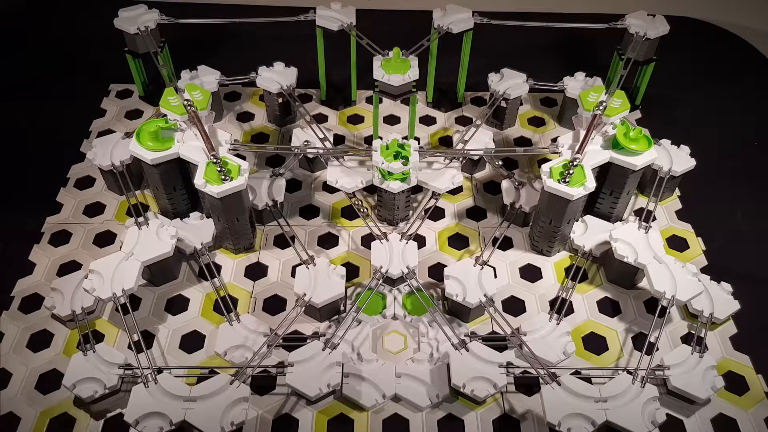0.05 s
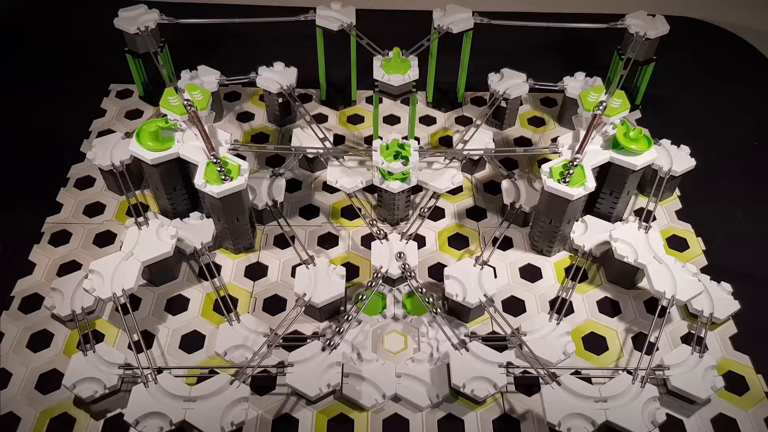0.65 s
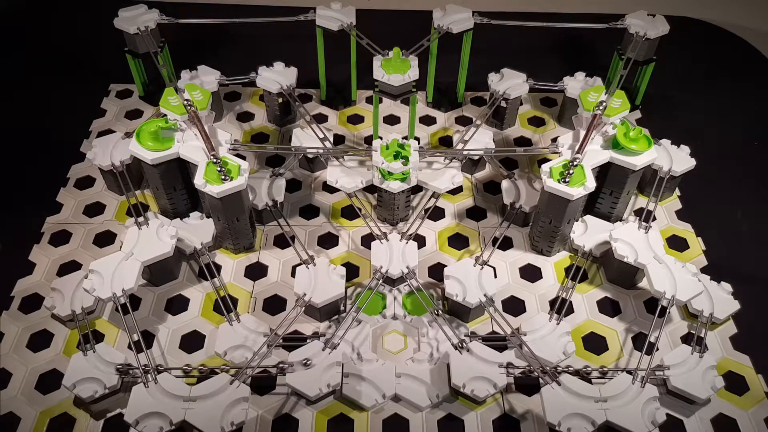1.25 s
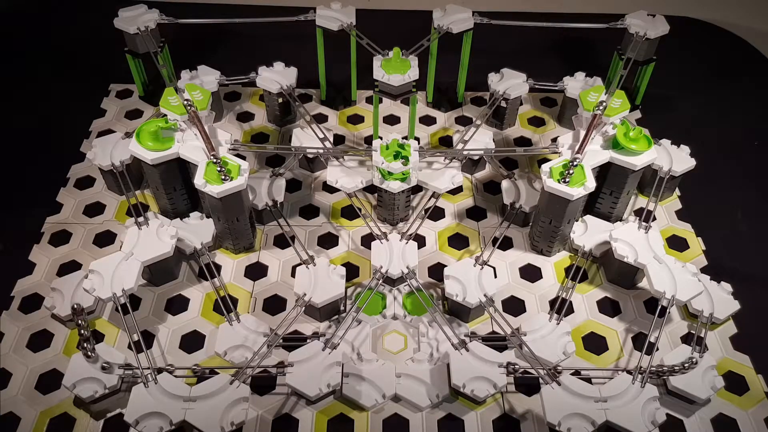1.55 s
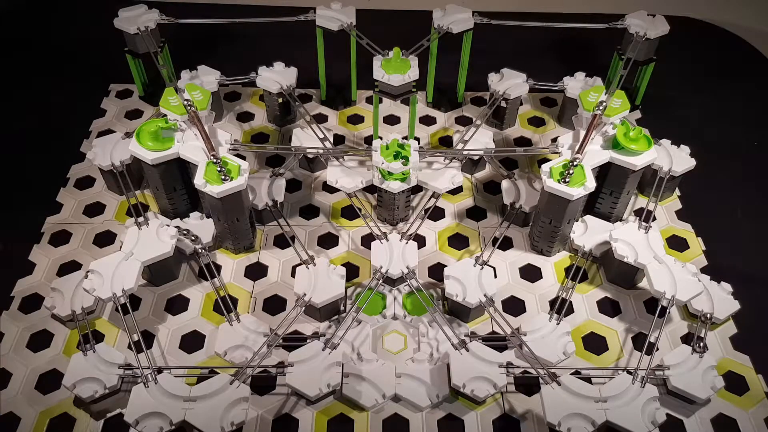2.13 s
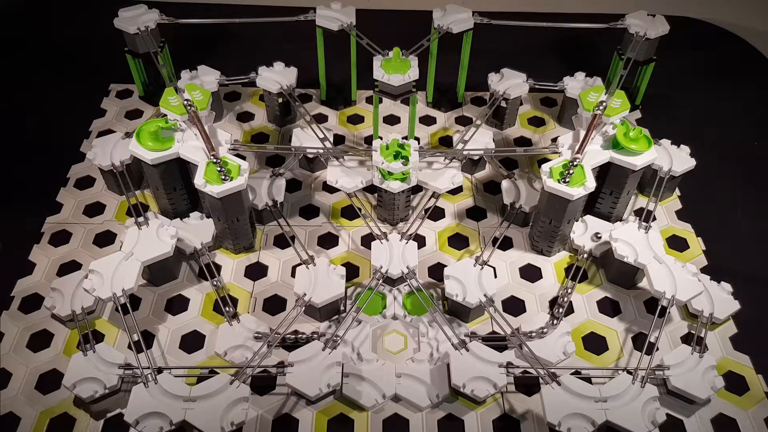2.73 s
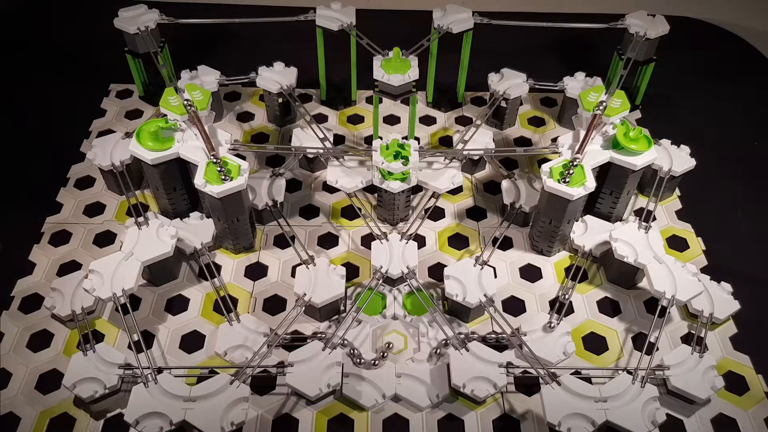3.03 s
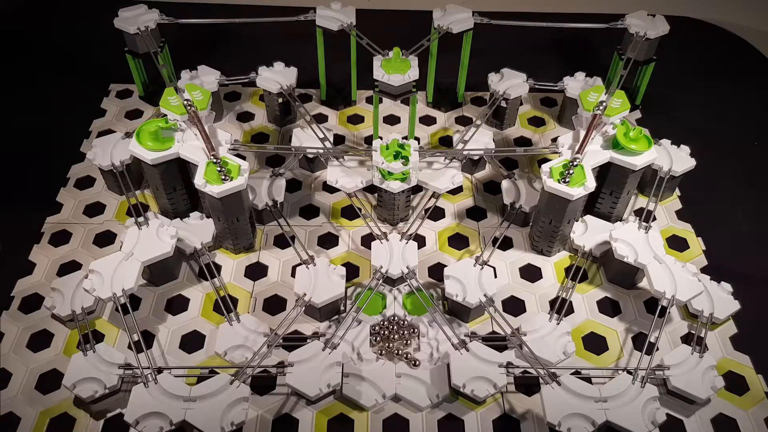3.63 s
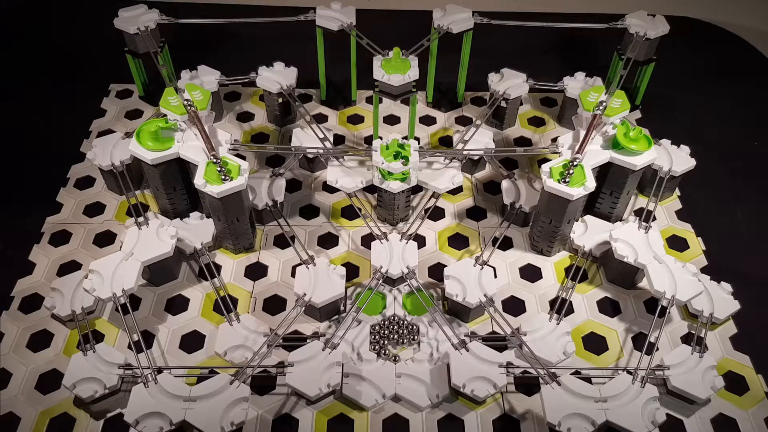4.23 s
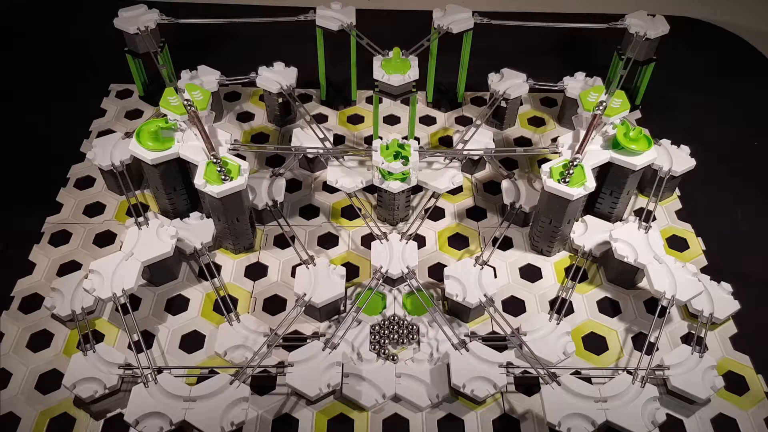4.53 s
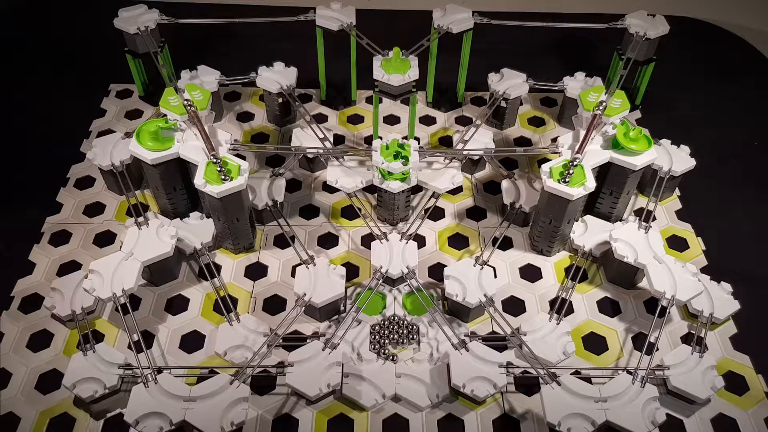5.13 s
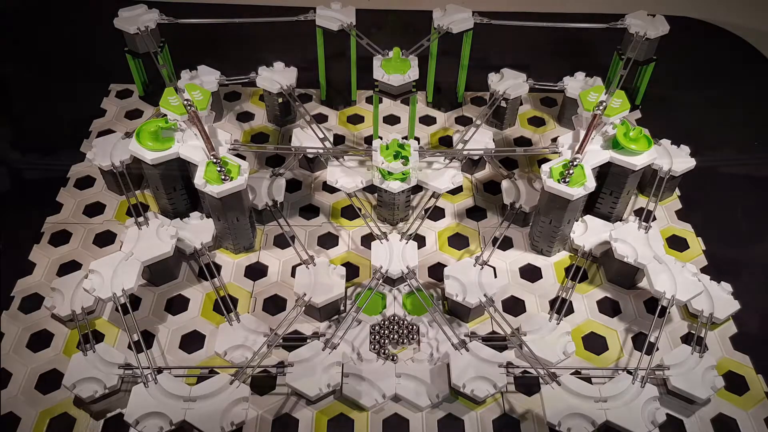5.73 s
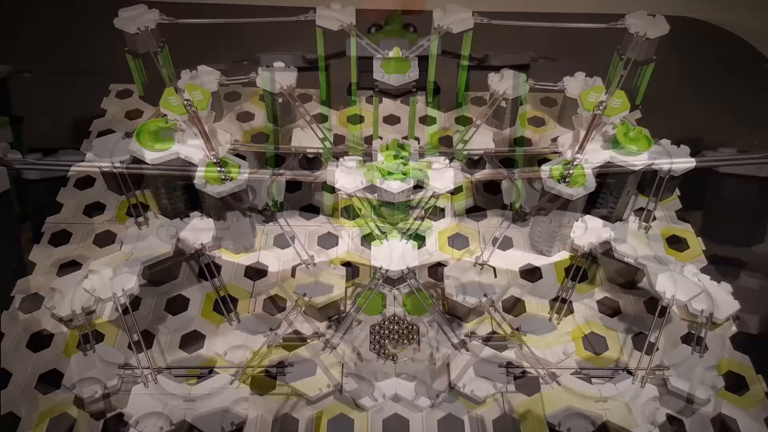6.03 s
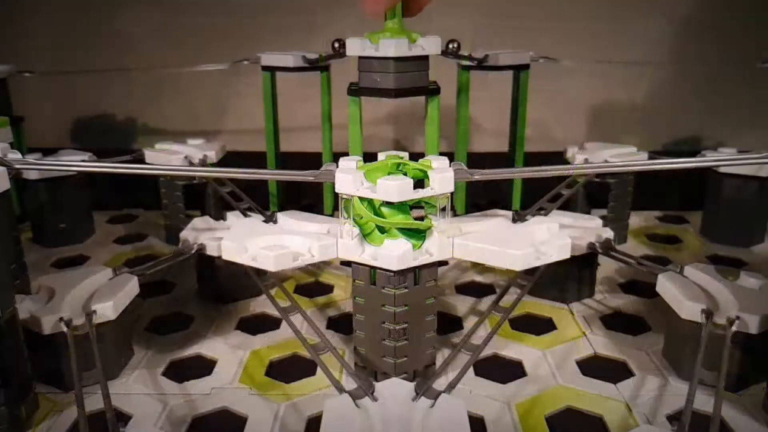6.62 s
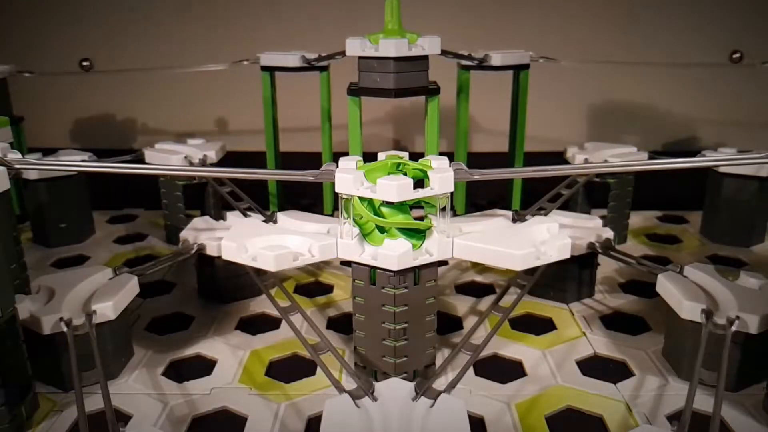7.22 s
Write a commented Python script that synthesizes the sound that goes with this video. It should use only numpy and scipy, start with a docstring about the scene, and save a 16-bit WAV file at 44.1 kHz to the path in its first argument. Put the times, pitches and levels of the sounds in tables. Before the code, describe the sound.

From the start, dozens of steel balls roll along the rails and plastic tiles of a marble track, a dense rattle dotted with sharp clicks and bright metallic ticks. From about 2.7 seconds they swirl into a thin tray, and the clatter grows, loudest around 3.3 seconds, with hard knocks as they pile up. It dies away by 4 seconds, and a few faint clicks follow as the last balls settle. A pause holds only faint room hiss and rumble. At about 6.3 seconds a plastic launcher is pressed, its plunger catching and slipping with small scraping clicks. More balls clatter out around 6.8 seconds and whirr softly along metal rods over a faint low hum. At about 7.3 seconds they drop onto small trampolines with four rapid, drum-like thumps. Everything is heard from close above the track in a small, quiet room.

```python
"""Dozens of steel balls run down the rails and plastic tiles of a table-top marble track, their many
tiny impacts exciting its resonances. From 2.65 s they swirl into a tray, pile up and settle. After a
pause a launcher is pressed (6.3 s): its plunger sticks and slips, and more balls clatter out, roll
along metal rods and drop onto small drum-like trampolines (7.3 s), whose skins ring in their modes.
All is heard from close above the track in a small quiet room."""
import sys
import numpy as np
from scipy import signal
from scipy.fft import rfft, irfft
from scipy.io import wavfile
from scipy.ndimage import uniform_filter1d

SR = 44100
rng = np.random.default_rng(int(sys.argv[2]) if len(sys.argv) > 2 else 0)


def wrap_up_sound(samples):
    """Save the sound to the file named by the first command line argument, as 16-bit audio."""
    columns = np.atleast_2d(samples).T
    # keep every value between -1 and 1, then stretch to whole-number steps
    tamed = np.clip(columns, -1, 1)
    steps = np.round(tamed * 32767).astype(np.int16)
    wavfile.write(sys.argv[1], SR, steps)


N = 325017
TIME = np.arange(N) / SR
TAPS = 2 ** 14   # samples in an impulse response
TRAY_FROM_S, TRAY_FULL_S, LAUNCH_S = 2.65, 3.26, 6.02
ROOM_T60_S, AVERAGING_S = 0.19, 0.14

# how hard the balls roll: t/s, level/dB re the usual effort
EFFORT = [(0, -3.5), (0.22, -8.5), (0.48, -3.5), (0.62, -5), (0.85, 0), (1.2, -2), (1.42, -2), (1.6, 0),
          (2.05, 0.5), (2.23, 3.5), (2.37, 0), (2.65, 2.5), (2.982, 3.5), (3.2, 8.5), (3.29, 5.5),
          (3.58, 2.5), (3.7, -3.5), (3.83, -13), (3.89, -2), (3.971, -27.5)]
# board, tiles, rails and balls on the track: level/dB at the usual effort, exponent of the effort
TRACK_MIX = [(-42.5, 0.54), (-34, 0.77), (-35, 0.51), (-43.5, 0.67)]
# the same four bands in the tray: level/dB, exponent of the effort
TRAY_MIX = [(-40, 0.73), (-33, 1), (-44.5, .9), (-49.5, 0.839)]
# balls jostle in bunches: t/s, length/s, lift of the steel/dB
JOSTLING = [(0.453, 0.08, 3), (0.658, 0.47, 4), (0.885, 0.043, 4), (1.656, 0.39, 4), (2.218, 0.068, 5.5),
            (2.532, 0.038, 3.5), (3.54, 0.09, 2.5)]
# bare rods spare the board: t/s, length/s, level change/dB
ROD_CROSSING = (0.97, 0.32, -4.5)
# resonant stretches of track: start t/s, end t/s, first f/Hz, last f/Hz, width/Hz, level/dB
STRETCHES = [(0.085, 0.12, 2400, 1900, 600, -39.5), (0.03, 0.75, 112, 106, 28, -53),
             (0.31, 0.51, 1270, 1250, 140, -44.5), (0.36, 0.79, 2465, 2385, 80, -42),
             (0.8, 0.85, 2440, 2380, 98, -37), (0.8, 1.1, 1245, 1220, 41, -50),
             (1.525, 1.55, 2400, 2300, 550, -34.5), (1.55, 2.7, 1670, 1790, 110, -42),
             (1.55, 1.85, 1280, 1220, 20, -48.5), (1.58, 2.03, 4100, 4000, 700, -41.5),
             (2.06, 2.26, 1275, 1230, 48, -38), (2.5, 2.95, 1265, 1250, 60, -43),
             (2.43, 2.69, 4950, 4790, 110, -40), (2.85, 3.62, 1030, 1030, 130, -35.5)]
# broad response of the track: f/Hz, level/dB
TRACK_COLOUR = [(20, -34), (35, -12), (60, -9.5), (150, -3.5), (290, -10), (440, -8), (620, -11), (860, -6),
                (1250, -5.5), (1750, -1), (2200, -5), (3200, -7.5), (5000, -2), (7000, -13.5), (11500, -9),
                (15800, -23)]
# its resonances and hollows: f/Hz, width/Hz, lift/dB
TRACK_PEAKS = [(109, 20, 4), (144, 22, -12.5), (315.4, 16, 9.5), (1070, 38, -1), (1270, 260, 8.5),
               (2120, 130, -3), (2593, 190, 1.5), (4260, 284, 4.5), (8030, 150, 4), (11100, 330, 3)]
# broad response of the tray: f/Hz, level/dB
TRAY_COLOUR = [(20, -35), (50, -12), (110, -17.5), (150, -29.5), (220, -17.5), (500, -9.5), (750, -7.5),
               (1050, -3), (1500, -7), (2200, -13), (2900, -17.5), (3900, -15.5), (7000, -22.5),
               (10800, -15.5), (15800, -28.5)]
# its resonances: f/Hz, width/Hz, lift/dB
TRAY_PEAKS = [(110.9, 15, 16.9), (189, 45, 10), (305, 23, 13.2), (973, 43, 7.3), (1050, 79, 5),
              (1150, 50, 1.9), (1800, 270, 9.1), (2500, 280, 6.8), (2780, 550, 2.4)]
# broad response of the launcher: f/Hz, level/dB
LAUNCH_COLOUR = [(21, -41), (35, -25), (92, 2), (171, -5.5), (194, -7), (440, -10), (475, -13.5),
                 (948, -14), (1360, -12.5), (1940, -11), (7720, -21), (12200, -19), (15800, -34)]
# its resonances: f/Hz, width/Hz, lift/dB
LAUNCH_PEAKS = [(85.8, 21, 3.4), (169.6, 15, 3.4), (980, 78, 6.6), (1950, 820, 3.3), (2430, 150, 1.5),
                (2990, 140, 4)]
# stereo width: f/Hz, side level/dB re mid
STEREO_WIDTH = [(60, -14), (200, -14), (700, -4.5), (1400, -2.5), (3000, -1), (8000, 0)]
# hard collisions: t/s, plastic level/dB, steel level/dB, f/Hz of the struck spot
HARD_HITS = [(0.4367, -46, -40, 1200), (0.883, -41, -46, 1260), (0.94, -32, -25.5, 1750),
             (0.9582, -28.5, -27.5, 2590), (1.0459, -30, -27.5, 3070), (1.1064, -36, -32, 1820),
             (1.1955, -42, -27, 1700), (1.2433, -33, -27.5, 2650), (1.6792, -44, -30, 1770),
             (1.739, -42, -25.5, 1670), (1.957, -48, -26.5, 1730), (2.308, -28, -31, 1780),
             (2.4653, -36, -32, 1250), (2.5103, -37, -52, 1240), (2.535, -30, -39, 1230),
             (2.583, -26.5, -28.5, 1240), (2.6703, -24.5, -34, 1300), (2.923, -29, -37, 980),
             (2.9993, -25.5, -30, 2500), (3.0351, -21, -33, 1070), (3.043, -22.5, -39, 1800),
             (3.088, -19.5, -40, 1050), (3.1215, -36, -50, 2750), (3.1501, -21.5, -49, 1070),
             (3.1787, -26.5, -46, 2670), (3.1953, -30, -48, 1690), (3.225, -23, -34, 1270),
             (3.2315, -15.5, -40, 1150), (3.276, -29, -39, 2700), (3.301, -15.5, -27, 2900),
             (3.334, -17.5, -36, 2880), (3.3432, -20.5, -33, 2370), (3.359, -27, -46, 2900),
             (3.3871, -24, -45, 1020), (3.3992, -24.5, -42, 1090), (3.4684, -21, -45, 980),
             (3.4758, -22, -41.5, 1150), (3.4786, -27.5, -46, 2900), (3.4934, -29, -29.5, 2025),
             (3.503, -23, -38, 1040), (3.539, -23, -35, 980), (3.5722, -28, -37, 1010),
             (3.5925, -21.5, -30.5, 1750), (3.6098, -24, -33, 1200), (3.649, -27.5, -29.5, 1000),
             (3.6778, -25, -43, 1060), (3.719, -23, -55, 1070), (3.7481, -28.5, -49, 880),
             (3.7654, -34, -63, 1260), (3.795, -34, -53, 1360), (3.838, -51, -40, 2100),
             (3.8507, -22, -51, 1000), (3.8802, -26.5, -34, 2600), (3.889, -38, -47.5, 1740),
             (6.3182, -42.5, -44, 2040), (6.436, -34.5, -45, 1930), (6.4751, -33, -45, 1920),
             (6.5406, -46, -39, 2070), (6.7511, -31.5, -28, 2250), (6.7539, -40, -33.5, 1500),
             (6.792, -33, -31.5, 2420), (6.892, -41, -50, 2610), (7.329, -34.5, -40, 1090)]
# long modes of the tray: f/Hz, level/dB re the hit, t60/s
TRAY_RING = [(960, -22, 0.11), (1100, -19, 0.1), (1200, -22, 0.19), (1755, -23, 0.11), (2420, -17, 0.15),
             (3180, -21.5, 0.119)]
# balls that touch only each other: t/s, level/dB
BALL_TICKS = [(0.1985, -42), (0.259, -39), (0.4685, -31.5), (0.556, -33.5), (0.815, -38), (1.3703, -31),
              (1.6902, -33), (1.965, -27), (2.7612, -32), (3.177, -28), (3.1873, -35.5), (3.2411, -34),
              (3.2553, -29), (3.265, -29.5), (3.292, -28.5), (3.329, -29), (3.4646, -36.5), (3.832, -50),
              (3.8696, -38), (4.007, -48)]
# the last balls settle: t/s, level/dB, f/Hz
SETTLINGS = [(4.018, -49, 1130), (4.2324, -53, 1700), (4.321, -66.5, 2320), (4.3802, -73, 1380),
             (4.4361, -73, 1340), (4.623, -76.5, 1220)]
# broad resonances of the full tray: frequency ratio, level/dB
FULL_TRAY_RINGS = [(0.79, 5), (1, 8.5), (1.7, -2.5)]
# faint rustles in the pause: t/s, length/s, level/dB
PAUSE_RUSTLES = [(4.78, 0.056, -67.5), (5.78, 0.053, -65.5), (6.165, 0.081, -64.5)]
# clatter in and below the launcher: t/s, length/s, level/dB, treble lift/dB
CLATTER_BURSTS = [(6.316, 0.008, -57.5, 9.5), (6.435, 0.034, -43.5, 2), (6.533, 0.017, -44.5, 1),
                  (6.656, 0.094, -50, -3), (6.759, 0.046, -38, 2.5), (6.798, 0.04, -37, -6.5),
                  (6.876, 0.038, -40, -2), (6.927, 0.013, -42, 7), (7.327, 0.05, -43, 5)]
# board, tiles, rails and balls in a clatter: level/dB re the burst
CLATTER_LEVELS = [-5, 1.5, -0.5, -6.5]
# the same four bands as balls whirr along the rods: level/dB
WHIRR_LEVELS = [-70, -47, -49, -62]
# the plunger rubs in its guide: t/s, f/Hz, level/dB
PLUNGER_RUB = [(6.375, 1900, -56), (6.392, 1856, -51), (6.428, 1950, -57), (6.439, 1950, -41),
               (6.527, 1880, -66), (6.56, 1950, -55), (6.61, 1800, -51), (6.684, 1600, -43),
               (6.731, 1330, -59)]
# the plunger catches and slips: t/s, level/dB, f/Hz
PLUNGER_SLIPS = [(6.388, -41, 1820), (6.4369, -31, 2000), (6.504, -42, 1880), (6.5557, -36, 2080),
                 (6.571, -34, 1900), (6.6478, -35.5, 1950), (6.682, -38, 1920), (6.6983, -34, 1600)]
# modes excited by a slip: frequency ratio, level/dB, t60/s
PLUNGER_MODES = [(1, 0.5, 0.036), (0.88, -7.5, 0.045), (1.5, -13, 0.02)]
# balls land on the trampolines: t/s, level/dB
BOUNCES = [(7.265, -24.5), (7.287, -23), (7.303, -18), (7.3249, -20)]
# trampoline skin and frame: f/Hz, level/dB, t60/s
SKIN_MODES = [(107, -11, 0.15), (235, -6, 0.1), (263, -6.5, 0.16), (389, -11, 0.17), (470, -12, 0.14),
              (593, -8, 0.25), (690, -8.5, 0.099), (740, -11, 0.085)]
# spectrum of the room's hiss: f/Hz, level/dB
HISS_COLOUR = [(200, 6.5), (400, 1.5), (900, -2.5), (2000, -5.5), (4000, -8.5), (7500, -16), (9500, -7),
               (12000, -0.5), (15800, 1.5)]
# spectrum of its rumble: f/Hz, level/dB
RUMBLE_COLOUR = [(15, -13), (30, -12), (43, -11.5), (57, 6.5), (72, -9.5), (91, -3), (120, -13.5),
                 (200, -21), (300, -28.5), (600, -47)]
# brief swells of the rumble: t/s, length/s, level/dB
RUMBLE_SWELLS = [(3.95, 0.092, -59.5), (4.28, 0.09, -62), (4.85, 0.069, -62.5)]
# faint hum under the launch: f/Hz, rms level/dB
HUM_TONES = [(75.4, -59.5), (172.3, -56)]


def long_run(track, tray, width):
    """Incoherent sources add in power: the rolling passes gradually from the track to the tray."""
    in_tray = np.clip((TIME - TRAY_FROM_S) / (TRAY_FULL_S - TRAY_FROM_S), 0, 1)
    effort = gain_curve(EFFORT, fade_s=0.063)
    on_rails = rattle(track, width, per_s=2700)
    swirling = rattle(tray, width, per_s=1700)
    track_bands = np.sqrt(1 - in_tray) * four_bands(on_rails) * shaking(TRACK_MIX, effort)
    tray_bands = np.sqrt(in_tray) * four_bands(swirling) * shaking(TRAY_MIX, effort)
    board, tiles, rails, steel = track_bands + tray_bands
    jostle_db = sum(db * envelope(s, length, rise_s=0.025, fall_s=0.025) for s, length, db in JOSTLING)
    rails = rails * from_db(0.49 * jostle_db)
    steel = steel * from_db(jostle_db)
    start, length, spared_db = ROD_CROSSING
    board = board * from_db(spared_db * envelope(start, length, rise_s=0.15, fall_s=0.2))
    rolling = board * pan(db=3.0) + tiles * pan(db=2.5) + rails * pan(db=1.5) + steel * pan(db=5.5)
    return rolling + singing(on_rails) * pan(db=2.0)


def rattle(part, width, per_s, spread_db=4.5, spot_pass_s=0.09):
    """Rolling as shot noise: tiny random impacts, convolved with the response of each spot passed."""
    impacts = np.flatnonzero(rng.random(N) < per_s / SR * from_db(1.5 * drift(per_s=25)))
    sizes = from_db(spread_db * np.minimum(rng.exponential(1, N), 3.5)) * rng.choice([-1, 1], N)
    spots = np.floor(TIME / spot_pass_s + 3 * rng.random(N))[impacts]
    out = np.zeros((2, N))
    for spot in np.unique(spots):
        here = impacts[spots == spot]
        clicks = np.bincount(here - here[0], sizes[here])
        add(out, here[0] / SR, signal.fftconvolve(clicks[None], contact(part, width), axes=1))
    return rms_one(out)


def contact(part, width, ring_s=0.049, scatter_s=0.054, scatter_db=-13, room_db=-23, direct_db=-20):
    """Impulse response of a touch: direct pulse, local ring, scattering in the track, reverberation."""
    t = np.arange(TAPS) / SR
    decay = (from_db(-60 * t / ring_s) + from_db(scatter_db - 60 * t / scatter_s)
             + from_db(room_db - 60 * t / ROOM_T60_S))
    mid, side = rfft(rng.standard_normal((2, TAPS)) * decay) * part
    direct = part * from_db(direct_db) * np.linalg.norm(decay)
    return irfft(direct + mid + side * width * np.array([[1], [-1]]))


def response(colour, peaks=()):
    """Minimum phase: folding the cepstrum gives a causal response with this colour and these peaks."""
    hz = np.arange(TAPS // 2 + 1) * SR / TAPS
    db = at_hz(colour, hz) + sum(lift / (1 + (2 * (hz - f) / width) ** 2) for f, width, lift in peaks)
    cepstrum = irfft(np.log(from_db(db)))
    cepstrum[1:TAPS // 2] *= 2
    cepstrum[TAPS // 2 + 1:] = 0
    return np.exp(rfft(cepstrum))


def four_bands(stream):
    """Board, tiles, rails and balls each radiate in their own band, here levelled to unit mid rms."""
    edges_hz = [(35, 700), (700, 3300), (3300, 7500), (7500, 17000)]
    return np.array([evened(band(stream, low, high)) for low, high in edges_hz])


def shaking(mix, effort):
    """Power law: the amplitude of each band grows with the effort by its own exponent."""
    return np.array([from_db(db) * effort ** exponent for db, exponent in mix])[:, None]


def singing(stream, flutter_db=3):
    """Forced resonance: a stretch of track rings, fluttering, while the balls pass over it."""
    out = np.zeros((2, N))
    for start, end, first_hz, last_hz, width_hz, db in STRETCHES:
        span = slice(*np.searchsorted(TIME, [start - AVERAGING_S, end + AVERAGING_S]))
        t = TIME[span]
        ring = resonance(stream[:, span], np.interp(t, [start, end], [first_hz, last_hz]), width_hz)
        fade = np.exp(-np.abs(t - np.clip(t, start, end)) / 0.013)
        out[:, span] += ring * fade * from_db(db + flutter_db * drift(per_s=18)[span])
    return out


def collisions(track, tray, launcher, width):
    """Impact excitation: each blow sounds through the part reached; hard ones also excite its modes."""
    out = np.zeros((2, N))
    parts, borders = [track, tray, launcher], [TRAY_FROM_S, LAUNCH_S]
    knock_pan, tick_pan = pan(db=1.0), pan(db=4.5)
    for s, knock_db, tick_db in bumps():
        part = parts[np.searchsorted(borders, s)]
        add(out, s, knock(part, width) * from_db(knock_db) * knock_pan)
        add(out, s, tick(part, width) * from_db(tick_db) * tick_pan)
    for s, knock_db, tick_db, hz in HARD_HITS:
        part = parts[np.searchsorted(borders, s)]
        plastic = from_db(-3.24) * knock(part, width) + from_db(-9) * crack(part, width)
        plastic += modes([(hz, 3, 0.022)], spread_db=1)   # the struck spot rings
        if part is tray:   # the thin tray rings on
            plastic += modes(TRAY_RING, spread_db=3)
        add(out, s, plastic * from_db(knock_db) * knock_pan)
        add(out, s, tick(part, width) * from_db(tick_db) * tick_pan)
    for s, db in BALL_TICKS:
        part = parts[np.searchsorted(borders, s)]
        add(out, s, tick(part, width) * from_db(db) * tick_pan)
    return out


def bumps(count=110, knock_db=-41.5, tick_db=-38, spread_db=3):
    """Lesser random impacts scale with the effort: rows of t/s, knock level/dB, tick level/dB."""
    times, effort_db = np.transpose(EFFORT)
    s = times[-1] * (np.arange(count) + rng.random(count)) / (count + 8)
    db = 0.37 * np.interp(s, times, effort_db)[:, None] + spread_db * rng.standard_normal((count, 2))
    return np.c_[s, db + [knock_db, tick_db]]


def knock(part, width):
    """Ball on plastic: the yielding surface lengthens the contact and limits the treble."""
    touch = contact(part, width, ring_s=0.028, scatter_s=0.15,
                    scatter_db=-12.5, room_db=-21, direct_db=-12)
    return struck(band(touch, 90, 3100))


def tick(part, width):
    """Ball on ball: the very brief contact of steel gives a bright tick."""
    touch = contact(part, width, ring_s=0.02, scatter_s=0.13,
                    scatter_db=-11.5, room_db=-26, direct_db=-17.5)
    return from_db(0.5) * struck(band(touch, 5600, 27000))


def crack(part, width):
    """A strong direct pulse and fast damping give the dry crack on top of a hard knock."""
    touch = contact(part, width, ring_s=0.012, scatter_db=-15, direct_db=-6.5)
    return struck(band(touch, 2400, 3500))


def launch(stream):
    """Amplitude-modulated shot noise: faint rustles, clatter from the launcher, a whirr along rods."""
    fades = dict(rise_s=0.012, fall_s=0.038)
    plastic = bursts([(s, length, db) for s, length, db, _ in CLATTER_BURSTS], **fades)
    metal = bursts([(s, length, db + lift) for s, length, db, lift in CLATTER_BURSTS], **fades)
    clatter = from_db(CLATTER_LEVELS)[:, None] * [plastic, plastic, metal, metal]
    on_rods = np.clip((TIME - 6.574) / 0.19, 0, 1)
    whirr = np.outer(from_db(WHIRR_LEVELS), on_rods)
    board, tiles, rails, steel = four_bands(stream) * np.hypot(clatter, whirr)[:, None]
    rustles = rms_one(band(stream, 560, 16000, order=1))
    rustles *= bursts(PAUSE_RUSTLES, rise_s=0.0086, fall_s=0.046)
    balls = board * pan(db=3.0) + tiles * pan(db=3.0) + rails * pan(db=1.0) + steel * pan(db=4.5)
    return balls + rustles


def trampolines(side_db=-13, detune=0.025):
    """Membrane modes: each landing sets the skin ringing; the soft contact leaves no treble."""
    out = np.zeros((2, N))
    for s, db in BOUNCES:
        skin = np.array(SKIN_MODES)
        skin[:, 0] *= 1 + detune * rng.standard_normal(len(skin))   # each landing stretches it anew
        mid, side = modes(skin, spread_db=1.2), modes(skin, spread_db=1.2)
        add(out, s, from_db(db) * (mid + from_db(side_db) * side * [[1], [-1]]))
    return band(out, 40, 1200, order=4) * pan(db=3.0)


def plunger(stream):
    """Stick-slip friction of plastic: a broad resonance sinks with the plunger, and each slip rings."""
    times, rub_hz, rub_db = np.transpose(PLUNGER_RUB)
    out = resonance(stream, np.interp(TIME, times, rub_hz), width_hz=690, order=2)
    out *= gain_curve(np.c_[times, rub_db], fade_s=0.0082)
    for s, db, hz in PLUNGER_SLIPS:
        slip = [(ratio * hz, db + mode_db, t60) for ratio, mode_db, t60 in PLUNGER_MODES]
        add(out, s, modes(slip, spread_db=4.5)[None])
    return band(out, 600, 12000, order=2) * pan(db=2.0)


def settling(width, half_band=0.094):
    """Damped resonance: a ball slips into place and the loaded tray rings briefly in broad bands."""
    out = np.zeros((2, N))
    edges = np.array([1 - half_band, 1 + half_band])
    for s, db, hz in SETTLINGS:
        touch = contact(1, width, ring_s=0.17, direct_db=-4)
        ring = sum(from_db(ring_db) * band(touch, *(ratio * hz * edges), order=2)
                   for ratio, ring_db in FULL_TRAY_RINGS)
        add(out, s, from_db(db) * struck(ring))
    return out


def room_tone():
    """Noise floor of hiss and lumpy rumble; with the launch the rumble grows and a hum comes in."""
    launched = np.clip((TIME - LAUNCH_S) / 0.39, 0, 1)
    swells = bursts(RUMBLE_SWELLS, rise_s=0.029, fall_s=0.038)
    rumble_gain = from_db(-65.5) + swells + from_db(-53) * launched
    rumble = rumble_gain * stereo_noise(RUMBLE_COLOUR, side_db=-10.5) * pan(db=3.0)
    hiss = from_db(-67) * stereo_noise(HISS_COLOUR, side_db=0.5)
    hum = sum(from_db(db) * np.sqrt(2) * np.sin(2 * np.pi * hz * TIME) for hz, db in HUM_TONES)
    return rumble + hiss + hum * np.interp(TIME, [6.1, 6.9], [0, 1])


def stereo_noise(colour, side_db):
    """Spectrally shaped noise: a mid signal of rms 1 and an independent side signal."""
    hz = np.arange(N // 2 + 1) * SR / N
    mid, side = irfft(rfft(rng.standard_normal((2, N))) * from_db(at_hz(colour, hz)), N)
    return rms_one(mid) + from_db(side_db) * rms_one(side) * [[1], [-1]]


def modes(table, spread_db):
    """Modal superposition: a blow excites damped sinusoids of random strength and sign."""
    t = np.arange(TAPS) / SR
    hz, db, t60 = np.transpose(table)[:, :, None]
    strength = from_db(db + spread_db * rng.standard_normal(hz.shape)) * rng.choice([-1, 1], hz.shape)
    return np.sum(strength * from_db(-60 * t / t60) * np.sin(2 * np.pi * hz * t), axis=0)


def resonance(x, hz, width_hz, order=1):
    """Heterodyne band-pass whose centre follows a pitch curve; rms 1."""
    carrier = np.exp(2j * np.pi * np.cumsum(hz) / SR)
    baseband = signal.sosfilt(signal.butter(order, width_hz / 2, fs=SR, output="sos"), x / carrier)
    return rms_one(evened((baseband * carrier).real))


def band(x, low_hz, high_hz, order=3):
    """Band-pass, its upper edge held below half the sample rate."""
    edges_hz = [low_hz, min(high_hz, SR * .45)]
    return signal.sosfilt(signal.butter(order, edges_hz, "band", fs=SR, output="sos"), x)


def gain_curve(rows, fade_s):
    """Gain through rows of t/s, level/dB, with exponential fades beyond the ends."""
    s, db = np.transpose(rows)
    outside = np.maximum(s[0] - TIME, 0) + np.maximum(TIME - s[-1], 0)
    return from_db(np.interp(TIME, s, db)) * np.exp(-outside / fade_s)


def envelope(start, length, rise_s, fall_s):
    """Linear rise, hold and exponential decay."""
    rise = np.clip((TIME - start) / rise_s, 0, 1)
    return rise * np.exp(-np.clip((TIME - start - length) / fall_s, 0, 20))


def bursts(rows, rise_s, fall_s):
    """Gain from rows of t/s, length/s, level/dB; overlapping bursts add in power."""
    power = sum((from_db(db) * envelope(s, length, rise_s, fall_s)) ** 2 for s, length, db in rows)
    return np.sqrt(power)


def drift(per_s):
    """Slow random fluctuation of rms 1."""
    knots = rng.standard_normal(int(N / SR * per_s) + 2)
    return rms_one(np.interp(TIME * per_s, np.arange(len(knots)), knots))


def evened(x):
    """Division by the running mid rms steadies the level and leaves the fast grain."""
    power = np.mean(np.atleast_2d(x), axis=0) ** 2
    return x / np.sqrt(np.abs(uniform_filter1d(power, int(AVERAGING_S * SR))) + 1e-20)


def struck(x):
    """Normalises an impact to rms 1 over its first 6 ms."""
    return x / np.std(x[:, :int(.006 * SR)])


def rms_one(x):
    """Normalises to rms 1."""
    return x / np.sqrt(np.mean(x ** 2) + 1e-20)


def from_db(db):
    """Level to amplitude ratio."""
    return 10 ** (np.asarray(db) / 20)


def at_hz(points, hz):
    """Interpolates a spectrum on a log-frequency axis."""
    f, db = np.transpose(points)
    return np.interp(np.log(hz + 1), np.log(f), db)


def pan(db):
    """Intensity panning: gains for a level difference of left over right."""
    return from_db(np.array([[db], [-db]]) / 2)


def add(out, s, sound):
    """Superposes a short sound at time s."""
    i = int(np.clip(s * SR, 0, N - 1))
    out[:, i:i + sound.shape[1]] += sound[:, :N - i]


def scene():
    """Linear superposition of both runs, their impacts and the room."""
    track = response(TRACK_COLOUR, TRACK_PEAKS)
    tray = response(TRAY_COLOUR, TRAY_PEAKS)
    launcher = response(LAUNCH_COLOUR, LAUNCH_PEAKS)
    width = response(STEREO_WIDTH)
    in_launcher = rattle(launcher, width, per_s=3000)
    runs = long_run(track, tray, width) + launch(in_launcher) + plunger(in_launcher)
    impacts = collisions(track, tray, launcher, width) + settling(width) + trampolines()
    return runs + impacts + room_tone()


def record(dry):
    """Soft saturation rounds the sharpest peaks; a steep low-pass limits the bandwidth."""
    ceiling, cutoff_hz = 0.62, 15950
    rounded = ceiling * np.tanh(dry / ceiling)
    return signal.sosfilt(signal.ellip(12, .2, 80, cutoff_hz, fs=SR, output="sos"), rounded)


dry = scene()
out = record(dry)
wrap_up_sound(out)
```